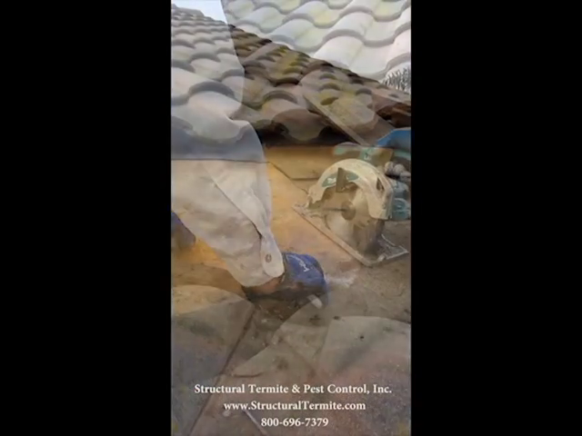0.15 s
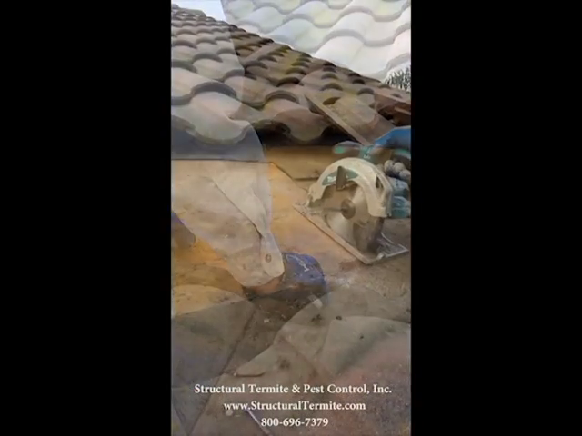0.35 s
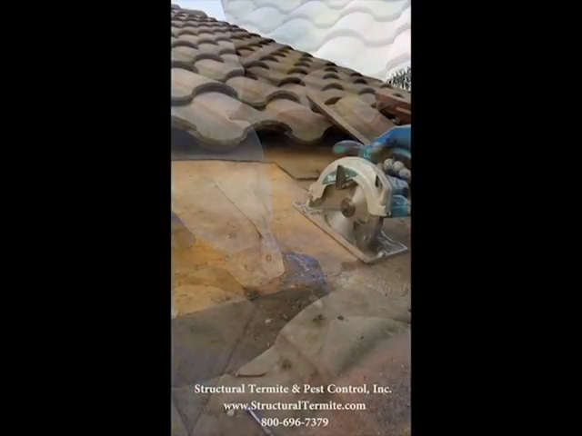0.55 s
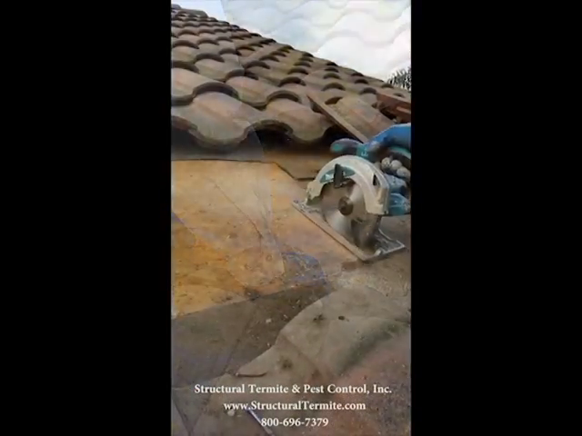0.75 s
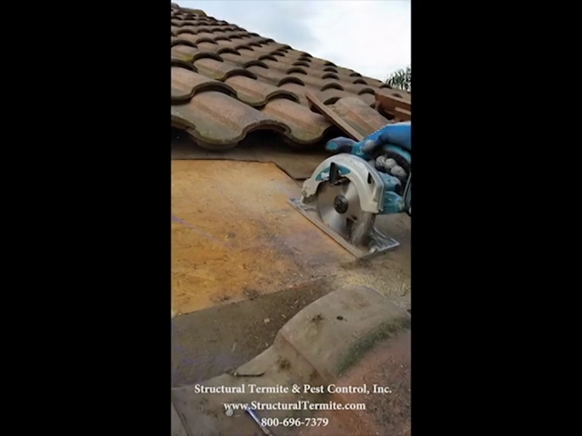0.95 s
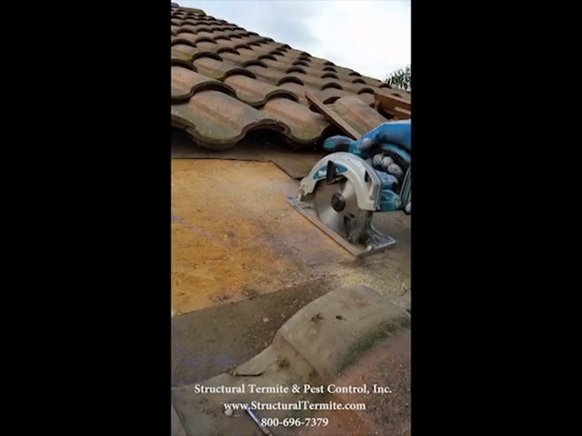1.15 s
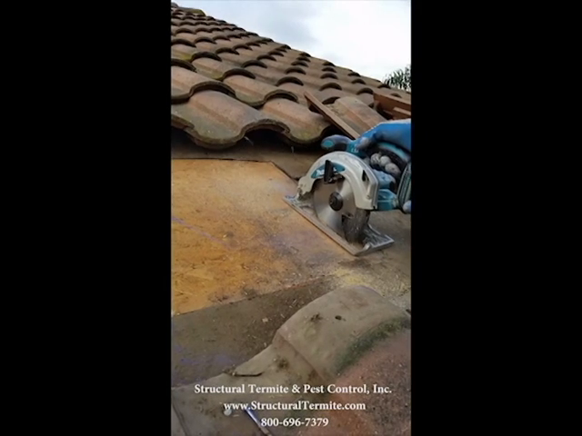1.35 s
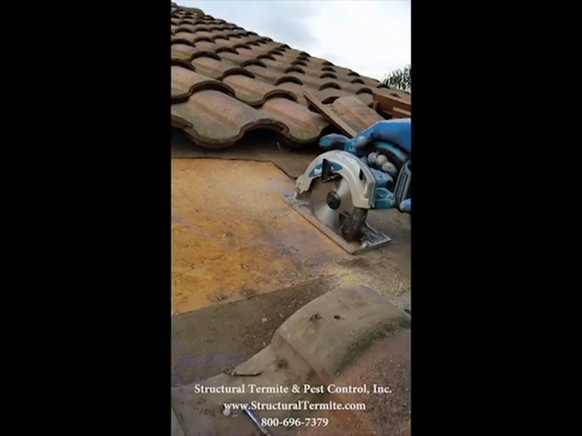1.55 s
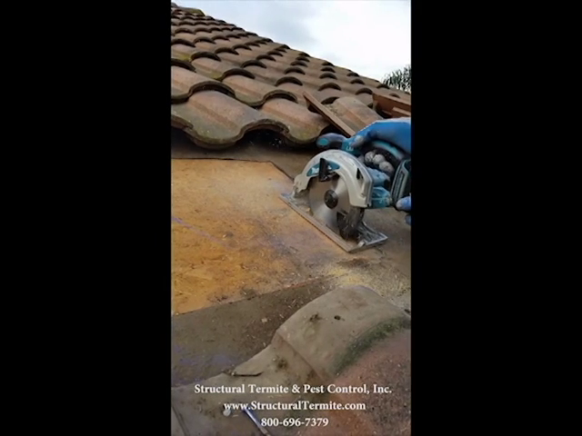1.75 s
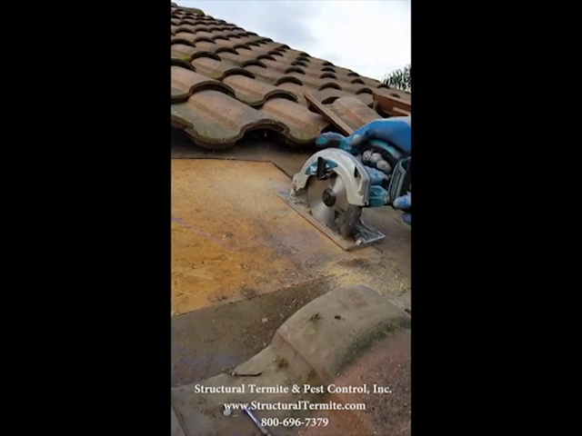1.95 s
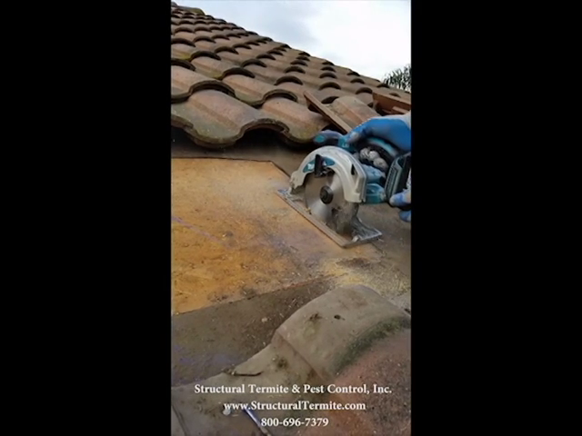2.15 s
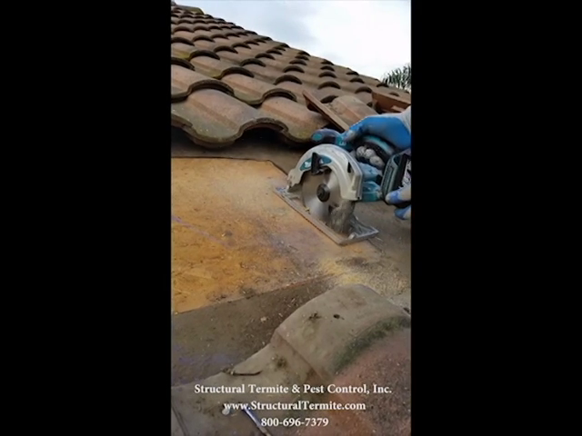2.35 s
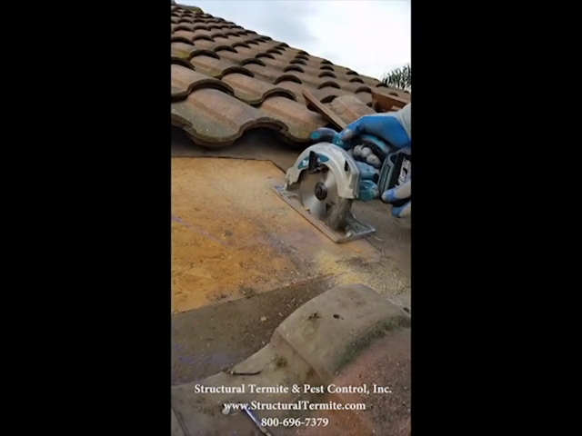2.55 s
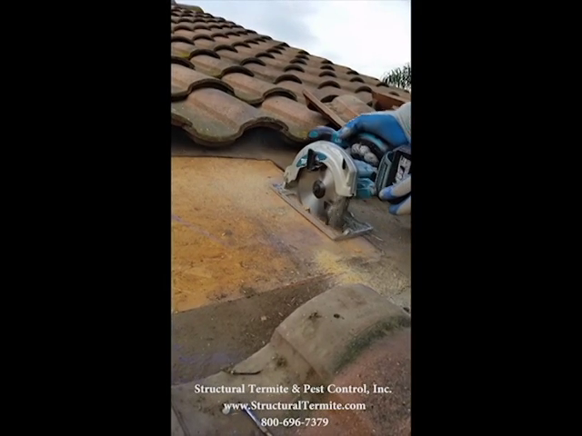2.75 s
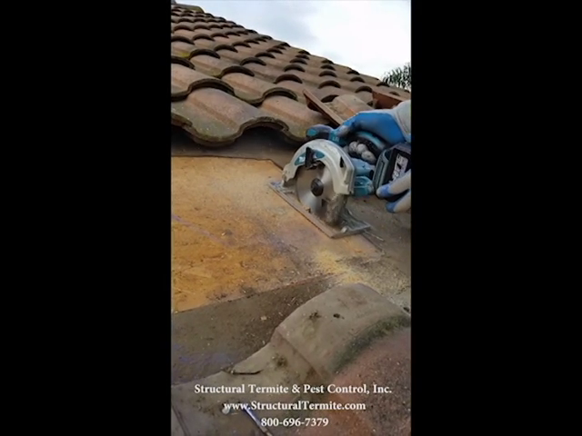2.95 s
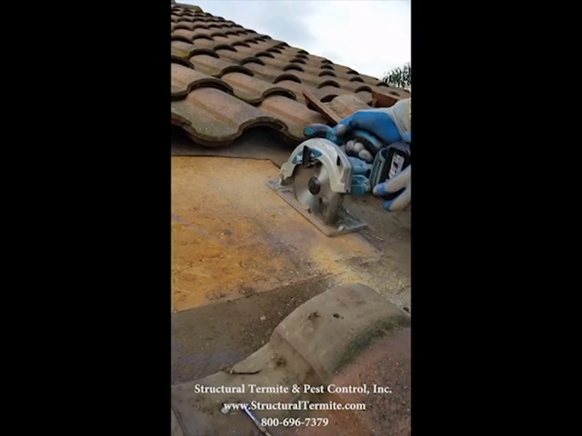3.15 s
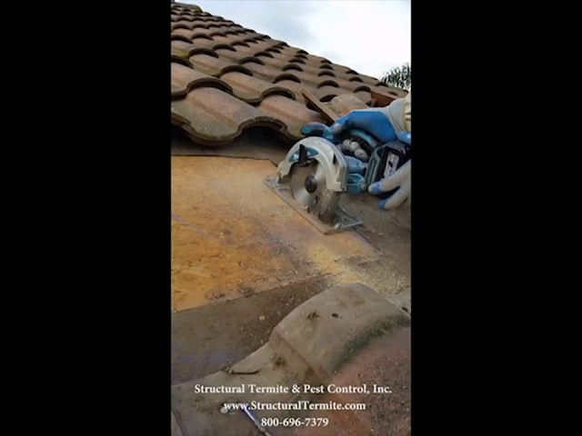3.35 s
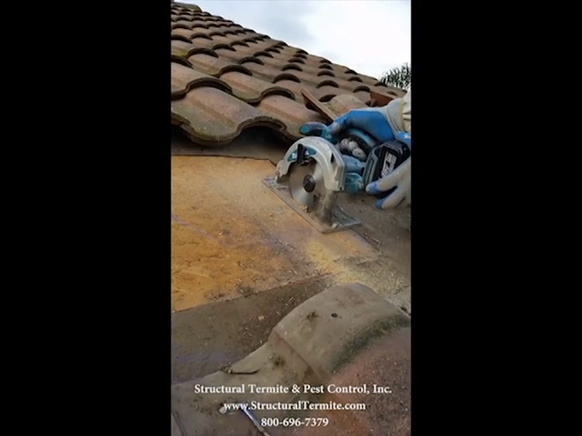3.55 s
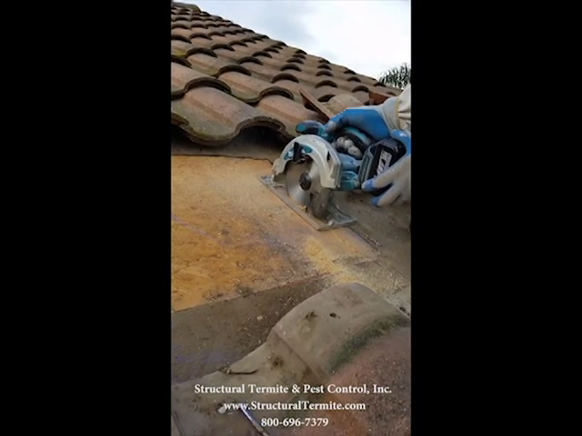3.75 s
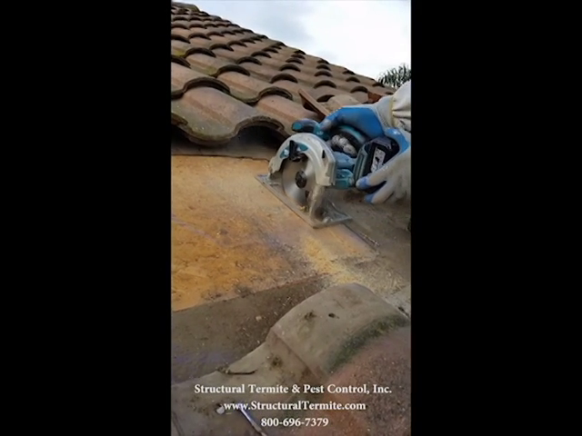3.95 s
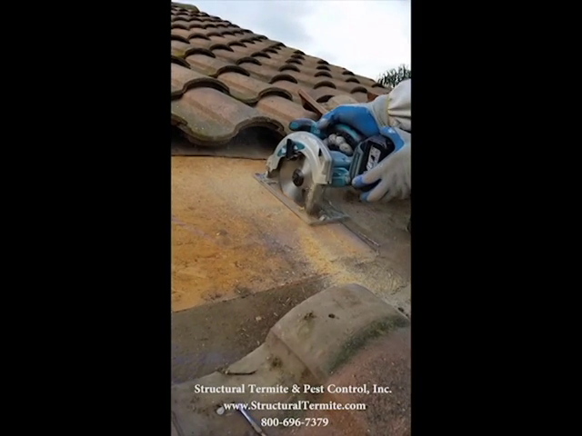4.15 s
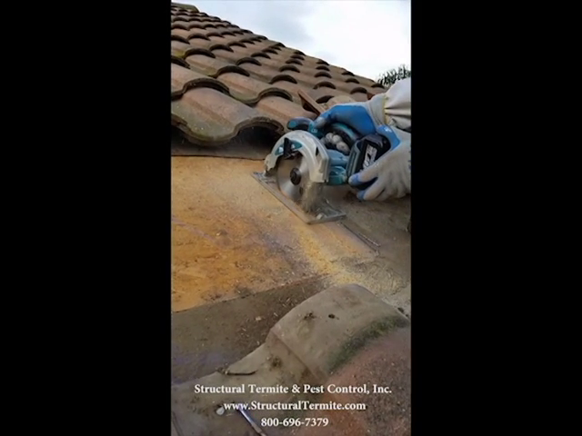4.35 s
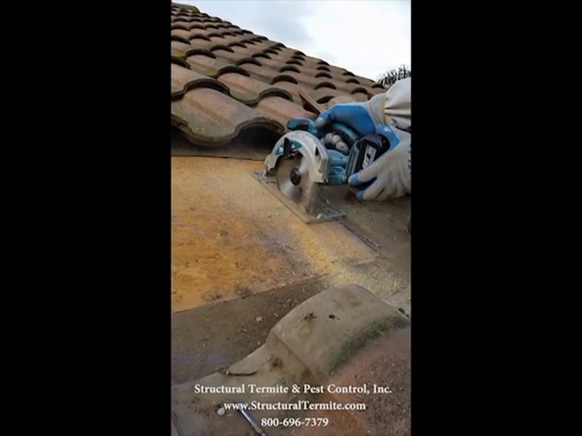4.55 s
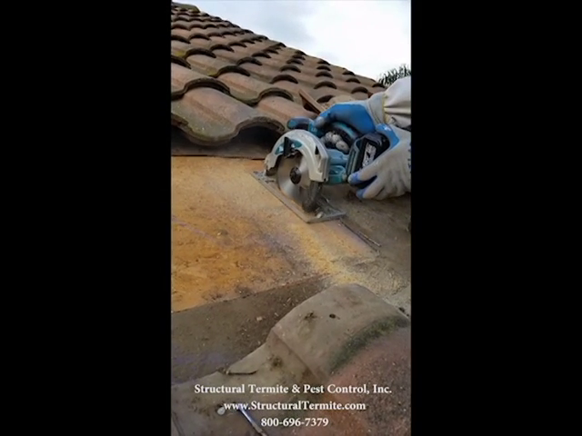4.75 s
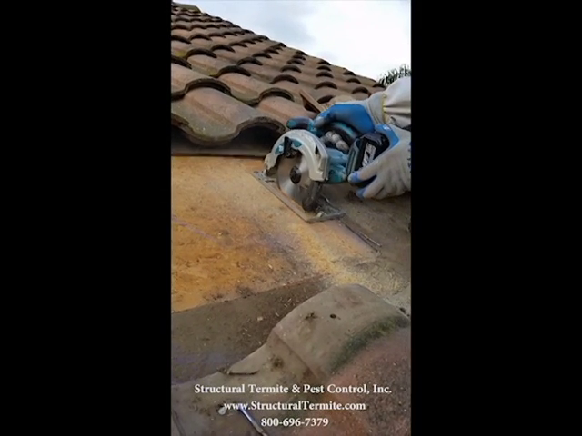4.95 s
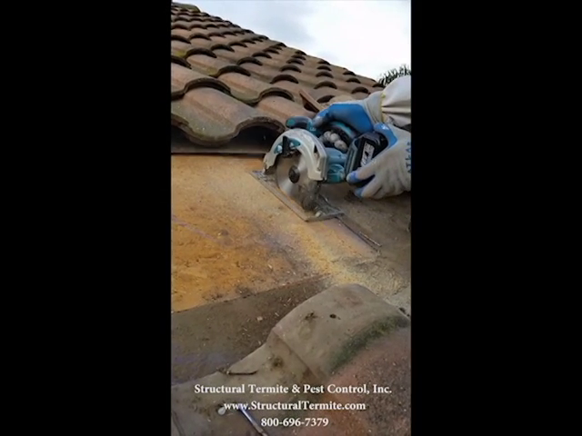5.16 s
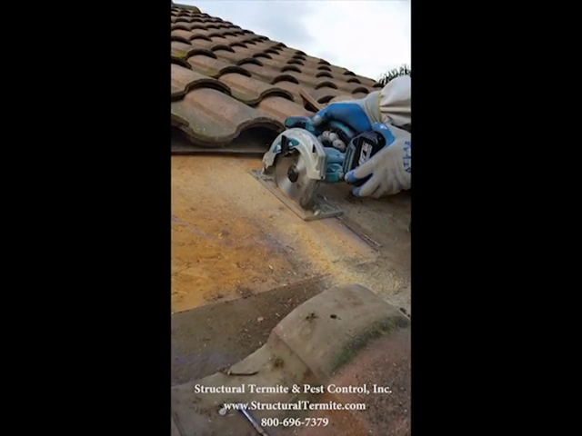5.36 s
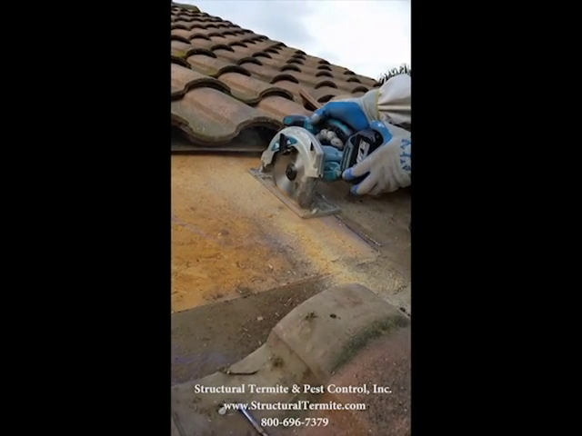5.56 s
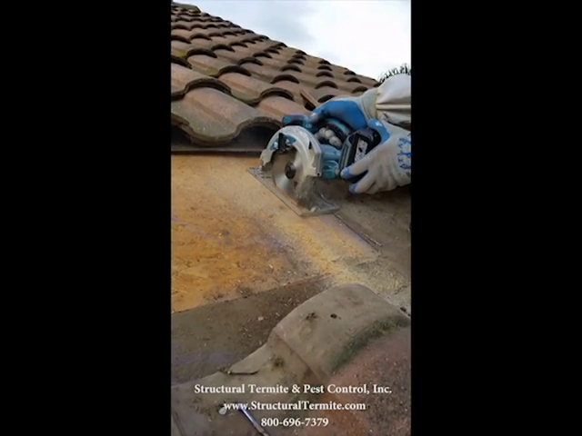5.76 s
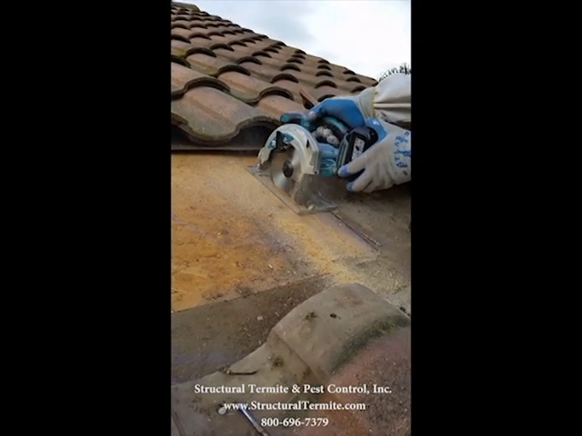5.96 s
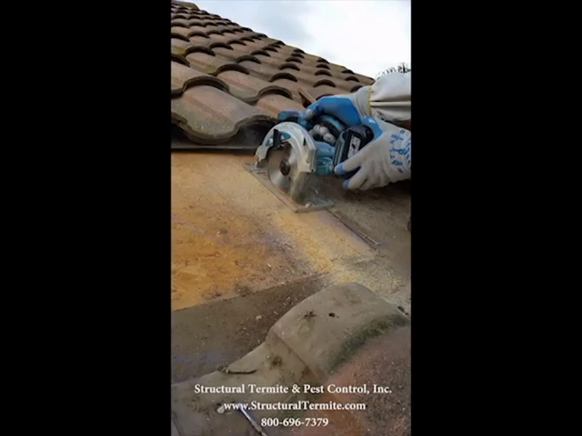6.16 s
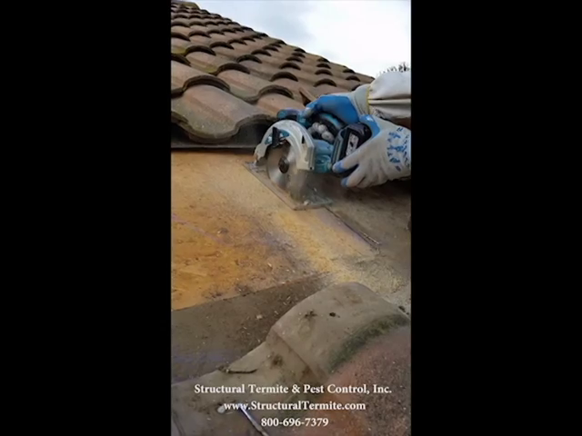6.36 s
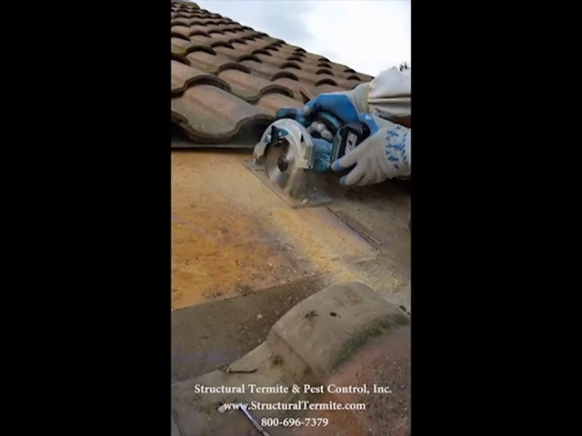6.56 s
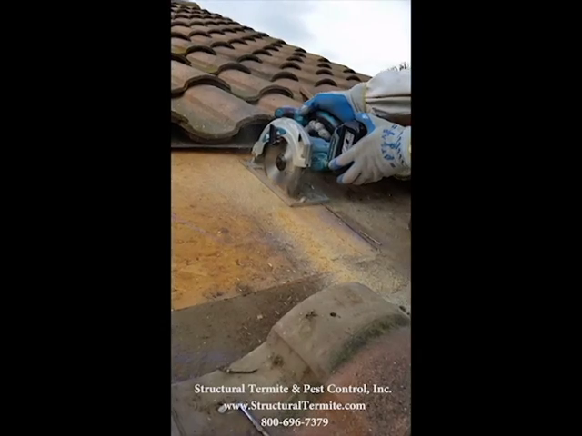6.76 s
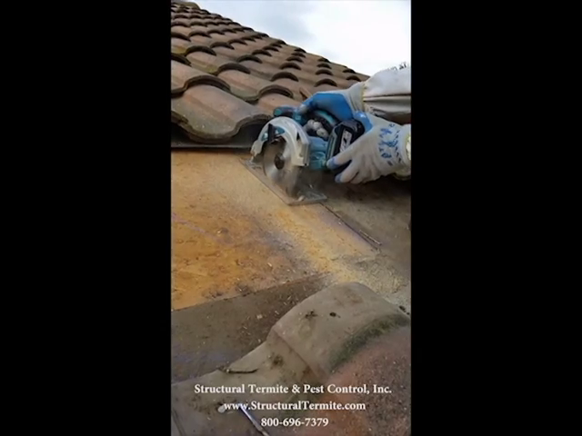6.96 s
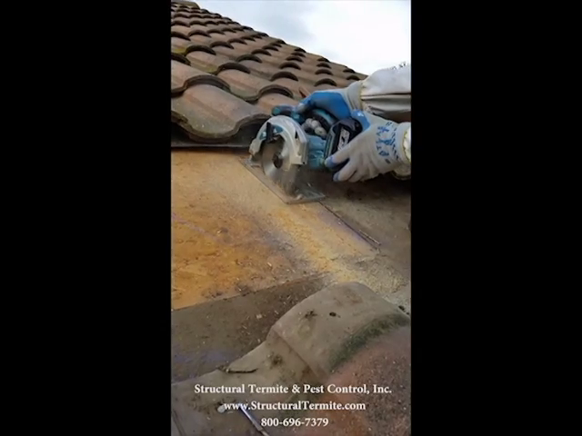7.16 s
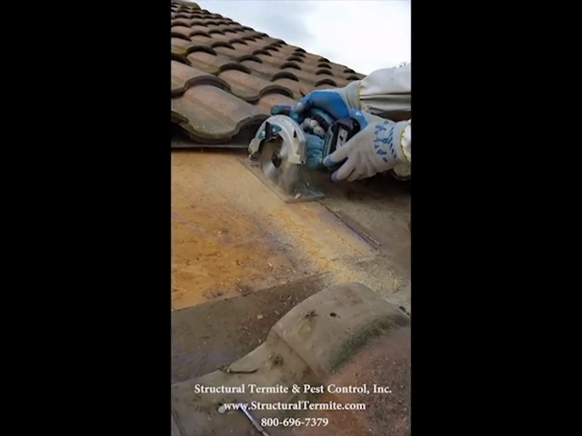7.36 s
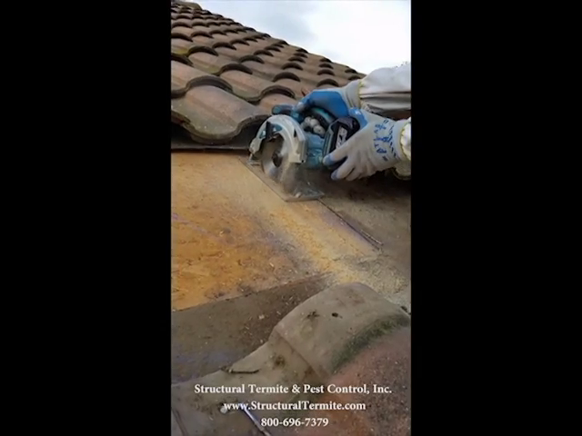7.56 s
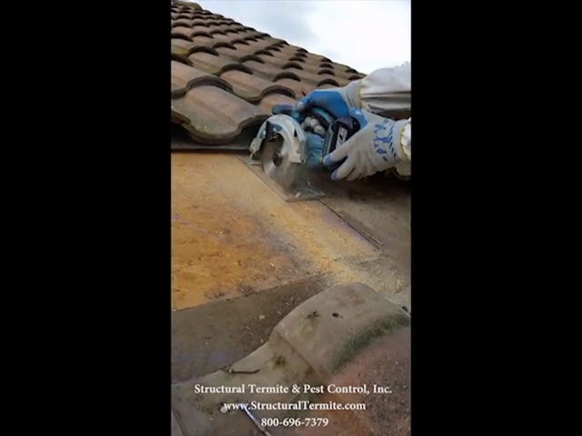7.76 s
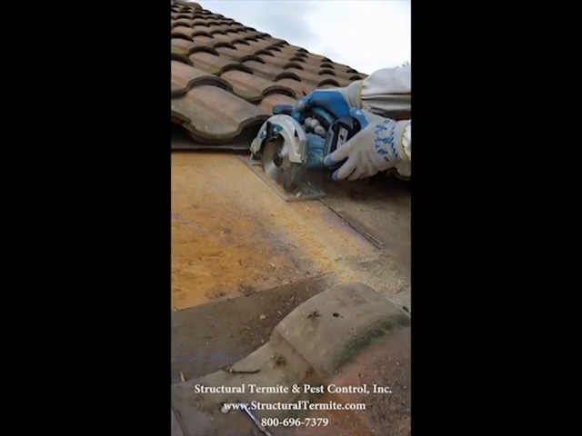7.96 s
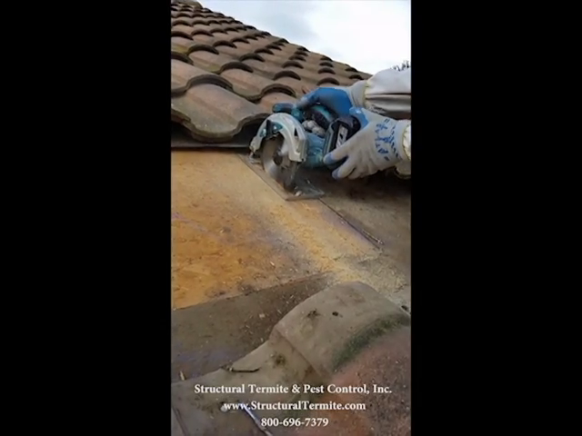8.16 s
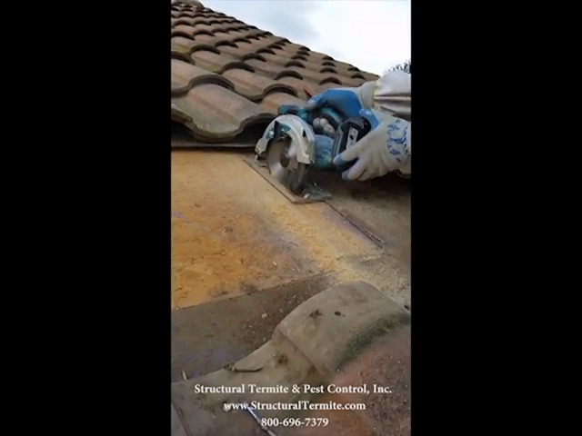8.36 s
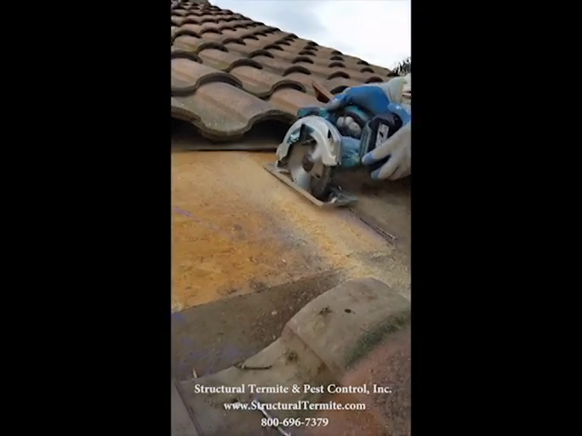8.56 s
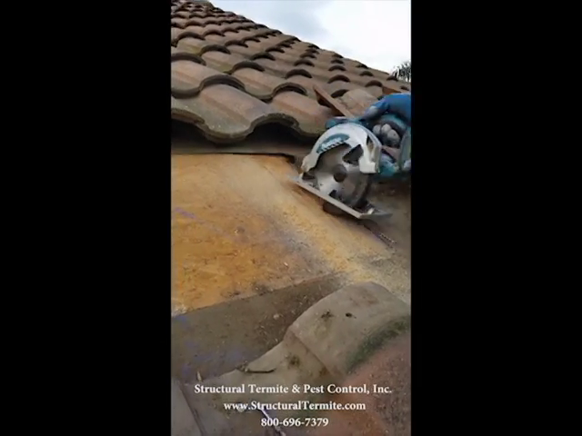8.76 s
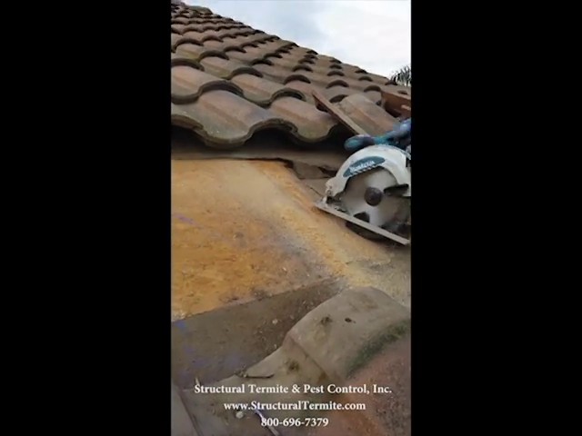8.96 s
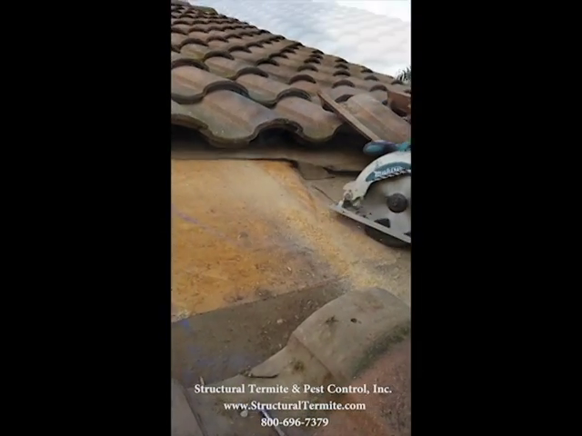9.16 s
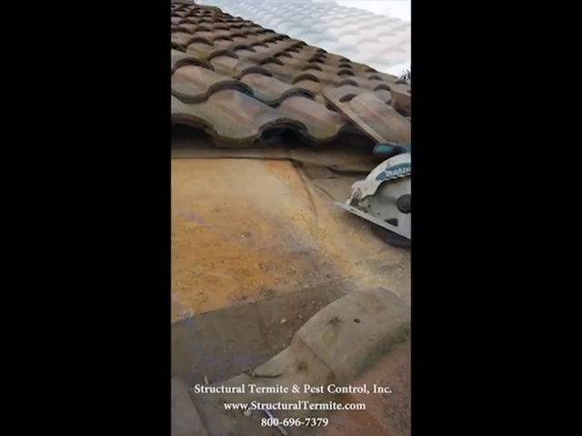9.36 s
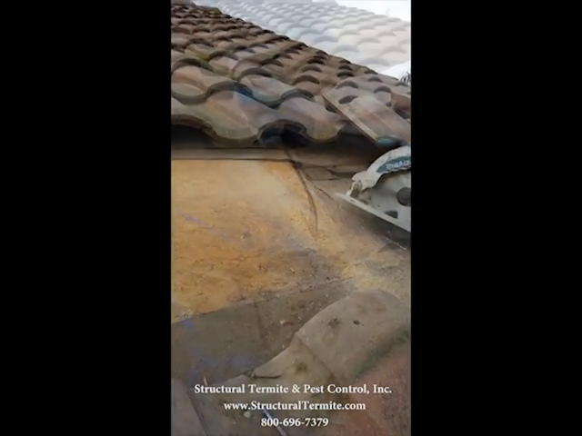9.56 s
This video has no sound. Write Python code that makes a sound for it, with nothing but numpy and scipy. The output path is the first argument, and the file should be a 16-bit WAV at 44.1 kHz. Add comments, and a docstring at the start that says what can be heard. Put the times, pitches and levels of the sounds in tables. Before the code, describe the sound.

A cordless saw slightly right of a close outdoor microphone starts suddenly after a short quiet gap. Bright, hissy tearing of wood fills the middle, over a pitch that falls as the motor strains and recovers briefly. Rapid buzzing slaps come in later. Then the blade brakes quickly, leaving quiet scrapes, a snapping guard, ticks and a last thud in open-air rumble.

```python
"""On a tiled roof, close to the microphones and a little to the right: a breath of low rumble, then silence.
A cordless circular saw bites into plywood: a nearly steady, slightly uneven noise rasps, and its guard rings.
Pushed harder, the motor's tones sag and growl, low noise swells and the blade chatters; puffs of air arrive.
The trigger is let go and the blade rings out; the saw is lifted with a small squeak, its guard snaps shut
and it is dragged aside in gritty strokes, knocks and ticks, over a low outdoor rumble of shaped noise."""
import sys
import numpy as np
from scipy import signal
from scipy.fft import rfft, irfft, next_fast_len
from scipy.io import wavfile
from scipy.ndimage import uniform_filter1d, minimum_filter1d, map_coordinates

SR = 44100
rng = np.random.default_rng(int(sys.argv[2]) if len(sys.argv) > 2 else 0)


def master(y):
    """Save y as 16-bit WAV."""
    cut = np.clip(np.atleast_2d(y).T, -1, 1)
    pcm = np.round(cut * 32767)  # scale
    wavfile.write(sys.argv[1], SR, pcm.astype(np.int16))


N = 424241
STOP_S = 7.931  # the trigger is let go
TOP_HZ = 14690  # nothing is heard above this


def amp(db):
    """Decibels to gain."""
    return 10 ** (np.asarray(db) / 20)


def unit(x):
    """x at rms 1."""
    return x / np.sqrt(np.mean(x ** 2) + 1e-20)


def along(points, hz, axis=1):
    """One column of a table of (Hz, ..) rows, on a log frequency axis."""
    table = np.transpose(points)
    return np.interp(np.log(hz + 1), np.log(table[0] + 1), table[axis])


def curves(rows):
    """One value per sample for each column after the time."""
    s, *cols = np.transpose(rows)
    return [np.interp(np.arange(N) / SR, s, c) for c in cols]


def during(rows):
    """1 while a table lasts, with short soft edges."""
    t = np.arange(N) / SR
    return np.clip(np.minimum(t - rows[0][0], rows[-1][0] - t) / .01 + .5, 0, 1)


def swell(middle, length, order=2):
    """A smooth bump of height 1; a higher order flattens its top."""
    distance = np.abs(2 * (np.arange(N) / SR - middle) / length)
    return np.exp(-np.minimum(distance, 10) ** order)


def wobble(rate):
    """A smooth random curve, rate knots a second."""
    knots = rng.standard_normal(int(N * rate / SR) + 4)
    return map_coordinates(knots, [np.arange(N) * rate / SR])


def sway(rate):
    """A smooth random curve that stays between -1 and 1."""
    return np.tanh(wobble(rate))


def filtered(x, response):
    """x times a response of frequency."""
    m = next_fast_len(N + SR // 2)
    return irfft(rfft(x, m) * response(np.fft.rfftfreq(m, 1 / SR)), m)[..., :N]


def pair(alike, lead=((1, 0),)):
    """White stereo noise with a given left-right coherence and phase."""
    size = next_fast_len(N)
    hz = np.fft.rfftfreq(size, 1 / SR)
    turn = np.arccos(np.clip(along(alike, hz), -1, 1)) / 2
    mid, side = rfft(rng.standard_normal((2, size))) * np.array([np.cos(turn), np.sin(turn)])
    shift = np.exp(np.outer([.5j, -.5j], along(lead, hz)))
    return irfft(np.array([mid + side, mid - side]) * shift, size)[:, :N]


def rush(spectrum, likeness):
    """Coloured stereo noise of rms 1."""
    return unit(filtered(pair([(1, likeness)]), lambda hz: amp(along(spectrum, hz))))


def pan(right_db):
    """Gains that lean a source to the right."""
    return amp(np.array([[-right_db], [right_db]]) / 2)


def whine(hz, flutter):
    """A tone whose frequency is slightly unsteady."""
    return np.sqrt(2) * np.sin(2 * np.pi * np.cumsum(hz * (1 + flutter * wobble(90))) / SR)


def resonances(modes, f):
    """Response of a body with (Hz, width, dB) modes of alternating sign."""
    total = 0
    for k, (centre, width, db) in enumerate(modes):
        damping = 1j * f * width
        total = total + (-1) ** k * amp(db) * damping / (centre * centre - f * f + damping)
    return total


def guard(f):
    """Response of the guard and shoe, confined to the middle of the spectrum."""
    # Each row: resonance in Hz, width in Hz, relative level in dB
    guard_modes = [(1011, 28, -12.5), (1176, 52, -4.5), (1252.2, 24.2, 5), (1540, 110, -10.5),
                   (1714, 70, -15)]
    return resonances(guard_modes, f) / np.sqrt((1 + (900 / (f + 1)) ** 12) * (1 + (f / 2300) ** 8))


def firm(x, share):
    """x with a share of its swelling and fading evened out, as in a steadily driven resonance."""
    strength = np.abs(signal.hilbert(x, next_fast_len(N))[:, :N]).mean(axis=0)
    return unit(x / (strength + .1) ** share)


def patchy(x, depth):
    """x with brief random patches of its spectrum raised and lowered, by (Hz, dB) depth."""
    hz, _, z = signal.stft(x, SR, nperseg=1024)
    field = uniform_filter1d(rng.standard_normal(z.shape[1:]), size=3, axis=0)
    field = uniform_filter1d(field, size=7, axis=1)
    patches_db = along(depth, hz)[:, None] * np.minimum(unit(field), 1)
    return unit(signal.istft(z * amp(patches_db), SR, nperseg=1024)[1][:, :N])


def outdoors():
    """Low open-air rumble before and after the cut, and puffs of air from the saw on the microphone."""
    # Rumble after the cut. Each row: time in seconds, level in dB before an 11 dB cut
    rumble_level = [(7.9, -57), (7.98, -38), (8.14, -43), (8.87, -39), (9.02, -26), (9.62, -26)]
    # Colour of the rumble. Each row: frequency in Hz, relative density in dB per Hz
    rumble_colour = [(15, -48), (25, -17), (103, -0.5), (228, -11), (305, -6.5), (443, -18.5), (520, -15),
                     (910, -22), (985, -19.5), (1190, -22.5), (2310, -40), (5000, -48), (6700, -53),
                     (8510, -49), (14500, -56)]
    # Puffs. Each row: middle in seconds, length in seconds, level in dB
    puffs = [(0.578, 0.079, -21.5), (1.843, 0.07, -32), (4.12, 0.61, -45), (4.46, 0.1, -44),
             (7.098, 0.77, -54.5)]
    opening = amp(-33.5) * during([(0,), (0.063,)])  # a first moment of rumble before the silence
    level = amp(curves(rumble_level)[0] - 11) * during(rumble_level) + opening
    puff_gain = sum(amp(db) * swell(s, length) for s, length, db in puffs)
    air = rush([(20, -30.5), (70, -7.5), (200, -15.5), (500, -19.0), (1500, -24.5)], likeness=0.36)
    return level * rush(rumble_colour, likeness=0.91) * pan(.7) + puff_gain * air


def strokes():
    """Gain of the scraping: each stroke of the shoe over gritty wood sets in, holds and dies away."""
    # Each row: start in seconds, length in seconds, level in dB, release in dB per second
    stroke_rows = [(8.284, 0.065, -63.5, 500), (8.37, 0.31, -68, 100), (8.617, 0.048, -62, 145),
                   (8.885, 0.052, -58, 200), (8.976, 0.18, -53, 380), (9.233, 0.062, -57, 56)]
    attack_s = 0.027
    t = np.arange(N) / SR
    gain = 0
    for s, length, db, release in stroke_rows:
        fade_db = release * np.maximum(t - s - length, 0)
        gain = gain + np.clip((t - s) / attack_s, 0, 1) * amp(db - fade_db)
    return gain


def scraping():
    """Unsteady friction of the shoe makes a gritty hiss and excites the guard's resonances."""
    # Colour of the grit. Each row: frequency in Hz, relative density in dB per Hz
    grit_colour = [(1500, -24.5), (2400, -8), (3200, -26), (3800, -12), (5100, -7), (5800, -7.5),
                   (7000, -10), (8700, -6), (10500, 4), (12500, -8), (14500, -16)]
    gain = strokes() * amp(2.5 * wobble(120) + 3 * sway(900))
    grit = amp(-3.5) * rush(grit_colour, likeness=0.077)
    ringing = amp(-2.5) * unit(filtered(pair([(1, 0.3)]), guard))
    return gain * (grit + ringing) * pan(8.7)


def squeak():
    """Rubbing as the saw lifts makes a small gliding tone."""
    # Each row: time in seconds, pitch in Hz, level in dB
    squeak_rows = [(8.37, 350, -85), (8.4, 405, -55), (8.425, 494, -47), (8.445, 497, -55),
                   (8.48, 487, -83)]
    hz, db = curves(squeak_rows)
    return amp(db) * whine(hz, 0.02) * during(squeak_rows)


def guard_ring(t):
    """The struck guard rings on decaying modes, and rattles loosely as a burst of band noise."""
    # Each row: frequency in Hz, typical relative level in dB, 60 dB decay time in seconds
    clank_modes = [(550, -22, .2), (633, -18, 0.18), (810, -7, 0.049), (913, -10, 0.04), (1075, 2.5, 0.034),
                   (1234, -4, 0.14), (1440, -11, .03), (1600, -17, .06), (1744, -14, 0.11), (2277, -33, .2)]
    ring = 0
    for hz, db, t60 in clank_modes:
        tone = np.sin(2 * np.pi * (hz * t + rng.random()))
        ring = ring + amp(db + rng.normal(0, 1.8) - 60 * t / t60) * tone
    band = signal.butter(3, [650, 1900], "bandpass", fs=SR)
    clack = unit(signal.lfilter(*band, rng.standard_normal(len(t))))
    return ring + amp(-17 - 60 * t / 0.066) * clack


def knocks():
    """Each contact of the saw rings the guard, ticks as a noise burst and thuds on the deck."""
    # Each row: time in seconds, guard ring in dB, tick in dB, tick centre in Hz, thud in dB
    contacts = [(8.307, -49, -65, 5000, -58), (8.33, -68, -63, 9000, -73), (8.441, -70, -63, 4300, -70),
                (8.487, -68, -62, 9000, -69), (8.62, -61, -60, 10000, -43), (8.645, -53, -64, 4900, -46),
                (8.683, -53, -66, 10000, -45), (8.888, -29.5, -58.5, 5000, -58),
                (8.897, -35, -61.5, 5000, -62.5), (8.919, -38, -53, 9000, -57),
                (9.071, -39, -46, 9000, -48), (9.263, -60, -47, 11500, -55), (9.284, -41, -41, 6860, -27)]
    thud_modes = [(135, 3.5, 0.11), (203, -1, 0.11), (308, -8, 0.11)]  # Hz, relative dB, t60 s
    tick_t60_s = 0.037
    out = np.zeros((2, N))
    t = np.arange(SR // 4) / SR
    for s, ring_db, tick_db, tick_hz, thud_db in contacts:
        ring = guard_ring(t) * (1 - np.exp(-t / 0.00049)) * pan(6.6)
        edges = [tick_hz / np.sqrt(2), min(tick_hz * np.sqrt(2), TOP_HZ)]
        band = signal.butter(1, edges, "bandpass", fs=SR)
        noise = unit(signal.lfilter(*band, rng.standard_normal((2, len(t)))))
        tick = amp(-60 * t / tick_t60_s) * noise * pan(4.3)
        thud = sum(amp(db - 60 * t / t60) * np.sin(2 * np.pi * hz * t) for hz, db, t60 in thud_modes)
        blow = amp(ring_db) * ring + amp(tick_db) * tick + amp(thud_db) * thud
        out[:, round(s * SR):][:, :len(t)] += blow
    return out


def handling():
    """The lifted and dragged saw: scrapes, a squeak and knocks."""
    return scraping() + squeak() + knocks()


def ringdown(start):
    """The braked blade rings briefly and unevenly on its own modes."""
    # Each row: frequency in Hz, level in dB, 60 dB decay time in seconds
    blade_modes = [(1200, -26, 0.23), (2100, -50, 0.25), (2800, -52.5, 0.24), (3660, -65, 0.8),
                   (4210, -60, 0.3), (6900, -64, 0.29)]
    t = np.maximum(np.arange(N) / SR - start, 0)
    ring = sum(amp(db - 60 * t / t60) * whine(np.full(N, hz), 24 / hz) for hz, db, t60 in blade_modes)
    return ring * (1 - np.exp(-t / 0.011)) * pan(3)


def running(fade_db_per_s):
    """Gain of the cut: it rises as the blade bites, holds, and dies when the brake acts."""
    start_s, entry_s = 0.38, .008  # the blade enters the wood, with a short fade-in
    bite_s, rise_db = 0.33, 25.5  # time to bite fully, and the rise in level meanwhile
    t = np.arange(N) / SR
    entering = np.clip(1 - (t - start_s) / bite_s, 0, 1)
    level_db = -rise_db * entering ** 3.3 - fade_db_per_s * np.maximum(t - STOP_S, 0)
    return np.clip((t - start_s) / entry_s, 0, 1) * amp(level_db)


def pushes():
    """Change in dB of rasp, guard ring, motor tone and deck as the hand leans on the saw or eases off."""
    # Each row: middle in seconds, length in seconds, then dB for rasp, guard ring, motor tone and deck
    push_rows = [(.59, 0.052, 2.5, 0, 8, 13.5), (0.855, 0.2, 0.5, 1.5, -4.5, 7),
                 (1.252, 1, 0, -1.5, 1.5, -1.5), (1.7, 0.5, 0, -2, 7.5, -5), (1.822, 0.14, 1.1, 8, 1, 10.5),
                 (2.15, 0.13, -0.5, -1.5, -7.5, 1.5), (2.315, 0.22, 0, 4, 3, 2),
                 (2.6, 0.2, -2, -2, -11, 3.5), (2.81, 0.14, 0.5, 4, 8, -6.5), (3.017, 0.15, 0, 1, 7, 0.5),
                 (3.392, 0.06, -2, 4.5, -3, 11), (3.86, 0.16, 0.5, -1.5, 5, 10.5),
                 (4.174, 0.45, -1.5, -1, 8, -10.5), (4.457, 0.11, -0.5, -0.5, 6, 10.5),
                 (4.738, 0.12, -0.5, -8, -21.5, -8), (5.05, 0.55, -0.5, -1.5, -17.5, -3),
                 (5.666, 0.43, -1, 2.5, -3, 1), (6, 0.69, 0.5, 0.5, 0, 7.5), (6.48, 0.043, 5, -1, -2, 4.5),
                 (6.583, 0.12, 2, 2.5, -8, -9), (7.05, 0.16, -1.5, -2.5, -9, -6.5),
                 (7.48, 0.27, 1, -2.5, -2, -1), (7.725, 0.53, 1, 3.5, 1, -0.5),
                 (7.846, 0.15, 2, 0.5, -11.5, 7.5)]
    return sum(np.outer(dbs, swell(s, length)) for s, length, *dbs in push_rows)


def deck(load, push_db):
    """Low noise on the deck's resonances, each with a random, unsteady level."""
    # Each row: resonance in Hz, width in Hz, relative level in dB
    deck_modes = [(64.3, 11, -18.5), (106, 39, -6), (149.7, 29.5, 3.5), (219, 43, -0.5), (296.7, 36, 5),
                  (396.5, 54, -4.5)]
    noise = pair([(1, 0.21)])
    low_noise = 0
    for mode in deck_modes:
        band = filtered(noise, lambda f: resonances([mode], f) / (1 + ((f - mode[0]) / 55) ** 4))
        low_noise = low_noise + amp(10.6 * sway(22)) * band
    level_db = -51.5 + 11.5 * load + push_db + 6 * sway(20)  # louder towards a stall
    return amp(level_db) * unit(low_noise) * pan(1.7)


def motor_hum(shaft_hz, turns, load, push_db):
    """The geared motor hums on a few shaft orders, throbbing once per blade turn under load."""
    # Each row: multiple of shaft speed, relative level in dB
    shaft_orders = [(1, -5.5), (2, 7.5), (6, 3.5)]
    # How the housing radiates the hum. Each row: frequency in Hz, gain in dB
    hum_colour = [(250, -17), (370, -21), (450, -9.5), (505, -2), (580, -13.5), (640, -12), (745, 5.5),
                  (840, -6), (1000, -13), (1550, 3), (1900, -19.5), (2600, -30.5)]
    throb = 1 + 1.2 * load * np.sin(2 * np.pi * turns + 0.38 * wobble(20))
    orders = sum(amp(db + 5.5 * sway(25)) * whine(k * shaft_hz, flutter=.016) for k, db in shaft_orders)
    radiated = filtered(throb * orders, lambda hz: amp(along(hum_colour, hz)))
    return amp(-61 + 26.5 * load + push_db) * radiated  # louder towards a stall


def motor_growl(shaft_hz, load):
    """Housing noise gives way under load to a rough tone at twice the shaft speed."""
    # Each row: time in seconds, level in dB about which the growl sways
    growl_level = [(.45, -39.5), (.58, -38.5), (.68, -48), (2.3, -42.5), (2.7, -51), (3.3, -41), (3.5, -37),
                   (3.65, -47.5), (3.95, -38), (4.45, -43.5), (4.6, -57.5), (5, -53.5), (5.3, -51.5),
                   (5.44, -43), (5.7, -39.5), (6.15, -43.5), (6.5, -36), (6.7, -42), (7.03, -49),
                   (7.2, -37), (7.4, -40.5), (7.6, -33.5), (7.72, -44.5), (7.93, -42)]
    housing_colour = [(350, -60.0), (450, 6.5), (530, 13.5), (595, 2.0), (660, -1), (740, -19.0),
                      (900, -12.5), (1300, -24)]  # Hz, relative dB
    housing = rush(housing_colour, likeness=0.17)
    strain = unit(whine(2 * shaft_hz, flutter=.055) * amp(5 * wobble(150)))
    share = np.clip(4.34 * load ** 2, 0, 1)  # power share of the tone
    growl = np.sqrt(share) * strain + np.sqrt(1 - share) * housing
    return amp(curves(growl_level)[0] + 2 * sway(40)) * growl


def motor(tooth_hz, turns, load, push_db):
    """The motor's hum and growl, both tied to the speed of the blade through the gear."""
    shaft_hz = .231 * tooth_hz
    return (motor_hum(shaft_hz, turns, load, push_db) + motor_growl(shaft_hz, load)) * pan(1.8)


def chatter(teeth, turns):
    """The binding blade slaps the cut's walls twice a turn, each slap a burst of tooth tone on the guard."""
    # Each row: middle in seconds, length in seconds, level in dB, limp (unevenness of the slaps) in dB
    chatters = [(3.54, 0.098, -18, -2), (3.836, 0.12, -27.5, 16), (4.492, 0.055, -28.5, 25.5),
                (5.646, 0.26, -20.5, 5), (6.213, 0.48, -20.5, 2), (6.78, .38, -25, 8),
                (7.147, 0.46, -22.5, 8.5), (7.684, 0.18, -23.5, 11)]
    # How the guard answers the slaps. Each row: frequency in Hz, gain in dB
    slap_colour = [(800, -37), (1000, -17.5), (1075, -24), (1140, -9.5), (1195, -5.5), (1245, 4),
                   (1295, -4), (1360, -30), (1700, -26.5)]
    gain = sum(amp(db) * swell(s, length, order=4) for s, length, db, _ in chatters)
    limp_db = sum(limp * swell(s, length, order=4) for s, length, _, limp in chatters)
    twice = np.cos(4 * np.pi * turns)
    limping = np.cos(3 * np.pi * turns)  # one and a half times a turn
    slaps = unit(amp(14 * twice + limp_db * limping + 2 * wobble(70)))
    bursts = filtered(slaps * teeth, lambda hz: amp(along(slap_colour, hz)))
    return gain * bursts * pan(2.9)


def tooth_tone(teeth, tooth_hz, motor_db):
    """The passing teeth sing, louder where blade and guard radiate their pitch well."""
    # Each row: tooth rate in Hz, gain in dB
    sing = [(900, -26.5), (1100, -19), (1150, -16.5), (1255, -7.5), (1340, -16.5), (1530, -18),
            (1565, -6.5), (1610, -16.5), (1745, -8.5), (1785, -11), (1860, -22)]
    level_db = -24.5 + along(sing, tooth_hz) + 0.2 * motor_db  # a push lifts it less than the motor
    level_db = level_db + 2.5 * sway(5.4) + 1.9 * sway(35)
    return amp(level_db) * teeth * pan(3)


def unevenness(tooth_hz, tooth_db, fast_db, slow_db):
    """Nearly steady strength of the cut, with slight random variation per tooth, fast and slow."""
    tooth = np.cumsum(tooth_hz) / SR
    scatter = map_coordinates(rng.standard_normal(N), [tooth], order=1)
    return unit(amp(tooth_db * scatter + fast_db * wobble(130) + slow_db * wobble(32)))


def rasp(force):
    """Tearing fibres sound through blade and housing, whose colour turns as the saw travels."""
    # Colour of the rasp. Each row: frequency in Hz, left gain in dB, right gain in dB
    rasp_colour = [(427, -35, -41.5), (1230, -18, -5.5), (1870, -13.5, -6), (2407, -14.5, -11.5),
                   (4235, -28, -20.5), (5750, -23.5, -21.5), (6640, -9.5, -10.5), (8010, -15.5, -15.5),
                   (9800, -4, 1.06), (15600, -9.5, -5), (14740, -14.5, -22)]
    # Resonances of blade and housing. Each row: centre in Hz, width in Hz,
    # left and right lift in dB at the start, left and right lift in dB at the end
    housing_lifts = [(2323, 230, -1.5, 4, -6, 7.5), (2807, 450, 5, -6, 7, -13), (2870, 48, 4, 14, -5.5, 24),
                     (3367, 160, 12.5, 11.5, 3.5, 11), (3773, 270, 15.5, 8.5, 14.5, 12.5),
                     (4460, 327, 3.5, 8.5, 14.5, 8.5), (5222, 823, 6, 15, 0, 14.5),
                     (6456, 225, 0, 14.5, 0, 7.5), (7024, 140, 7.5, 9, -5.5, 12.5),
                     (7666, 396, -8.5, 9.5, 9.5, 13.5), (8484, 190, 12, -17.5, 0.5, 15),
                     (9090, 220, -5.5, 12, 13.5, -18), (10035, 586, 5.5, 4.5, -4.5, 8),
                     (10606, 73, -2.5, 7, 9, 8.5), (11200, 550, -2, 5, 7.5, 4),
                     (12900, 540, 8.5, 2.5, -18, 2)]
    # Likeness of left and right. Each row: frequency in Hz, coherence
    rasp_likeness = [(60, 0.1), (99, 0.14), (160, 0.2), (270, 0.086), (450, 0.52), (740, -0.053),
                     (1220, 0.92), (2010, 0.1), (3330, 0.59), (5500, -0.042), (9080, 0.42), (15000, -0.44)]
    # Phase between the two microphone ports. Each row: frequency in Hz, radians by which left leads
    port_lead = [(0, 4.6), (1720, 0.1), (2240, 2.2), (2930, 6.83), (7490, 9), (8530, 13), (8960, 15),
                 (9650, 15.5), (10500, 19.4), (10900, 17), (11600, 26), (12100, 15), (13400, 15),
                 (15400, 23)]

    def colour(hz, stage):
        """Left and right response at the start (0) or end (1) of the travel."""
        lift = 0
        for centre, width, *dbs in housing_lifts:
            bump = np.exp(-((hz - centre) / width) ** 2)
            lift = lift + np.outer(np.reshape(dbs, (2, 2))[stage], bump)
        both = [along(rasp_colour, hz, axis=1), along(rasp_colour, hz, axis=2)]
        return amp(lift + both) * hz ** 6 / (hz ** 6 + 480 ** 6)

    tearing = force * pair(rasp_likeness, port_lead)
    start, end = [unit(filtered(tearing, lambda hz: colour(hz, stage))) for stage in range(2)]
    travel, = curves([(1.8, 0.061), (5.6, 0.84)])
    return start * (1 - travel) + end * travel


def saw():
    """Teeth rasp through the wood, ring the guard and sing at the rate at which they pass."""
    # Blade speed, sagging under load. Each row: time in seconds, teeth per second before a slight wobble
    blade_speed = [(.65,1970),(.85,1780),(.97,1738),(1.5,1765),(2.02,1520),(2.4,1568),(3.3,1420),(3.5,1120),(3.7,1335),(4,1100),(4.44,1095),(4.8,1710),(4.92,1770),(5.33,1450),(5.47,1180),
                   (5.72,1153),(5.9,1125),(6.35,1150),(6.48,1105),(6.62,1162),(6.9,1160),(7.08,1208),(7.33,1165),(7.5,1105),(7.62,1135),(7.71,1258),(7.93,1225),(8.07,420)]
    # Depth of random patches in the noise spectrum. Each row: frequency in Hz, depth in dB
    patch_depth = [(300, 17.5), (800, 15), (1200, 0), (3000, 4.5), (6000, 2.5), (10000, 2), (14000, 4)]
    free_hz = 1950  # teeth per second with no load
    body_hz = 4700  # below this the housing rings on after the teeth have stopped
    tooth_hz = curves(blade_speed)[0] * (1 + 0.002 * wobble(7))
    load = np.clip(1 - tooth_hz / free_hz, 0, 1)
    turns = np.cumsum(tooth_hz) / SR / 24  # 24 teeth on the blade
    rasp_db, ring_db, motor_db, deck_db = pushes()

    force = unevenness(tooth_hz, tooth_db=0.1, fast_db=0.52, slow_db=0.44)
    hiss = amp(-15 + rasp_db + 0.49 * wobble(13)) * patchy(rasp(force), patch_depth)
    body = filtered(hiss, lambda hz: 1 / (1 + (hz / body_hz) ** 6))
    ringing = firm(filtered(pair([(1, 0.89)]), guard), share=.55)
    ring = amp(-27.5 + ring_db + wobble(15)) * ringing * pan(3.3)
    teeth = whine(tooth_hz, flutter=.0035)
    tone = tooth_tone(teeth, tooth_hz, motor_db)
    drive = motor(tooth_hz, turns, load, motor_db) + deck(load, deck_db)
    braked = hiss - body + tone + chatter(teeth, turns) + drive
    return braked * running(fade_db_per_s=370.5) + (ring + body) * running(fade_db_per_s=277.5)


def scene():
    """Open air, handling, the blade's ringdown and the saw."""
    return outdoors() + handling() + ringdown(start=STOP_S) + saw()


def record(dry):
    """A limiter at the microphones holds down the highest peaks; nothing above the band limit is kept."""
    ceiling, reaction_s = 0.86, 0.02
    size = max(int(reaction_s * SR), 1)
    needed = ceiling / np.maximum(np.abs(dry).max(axis=0), ceiling)
    gain = uniform_filter1d(minimum_filter1d(needed, size), size)
    return filtered(dry * gain, lambda hz: np.clip((TOP_HZ - hz) / 150, 0, 1))


dry = scene()
out = record(dry)
master(out)
```